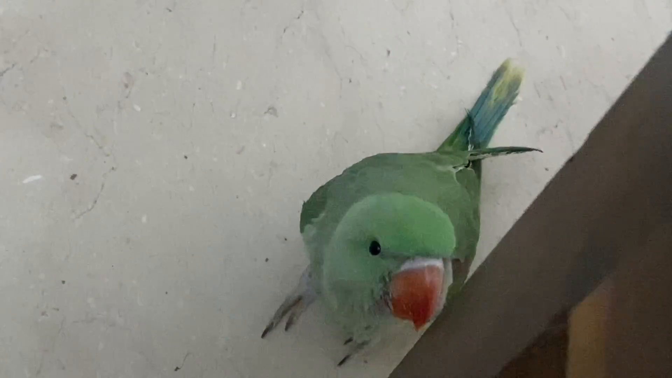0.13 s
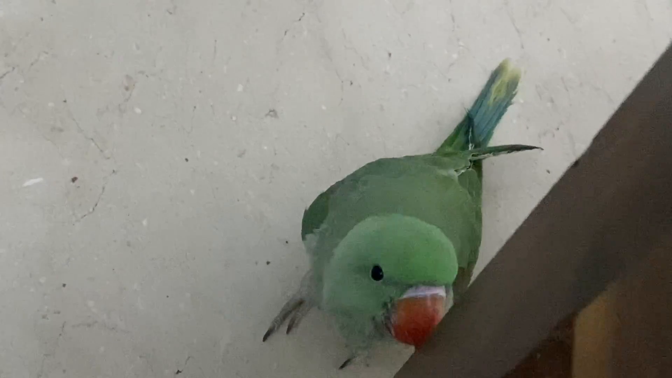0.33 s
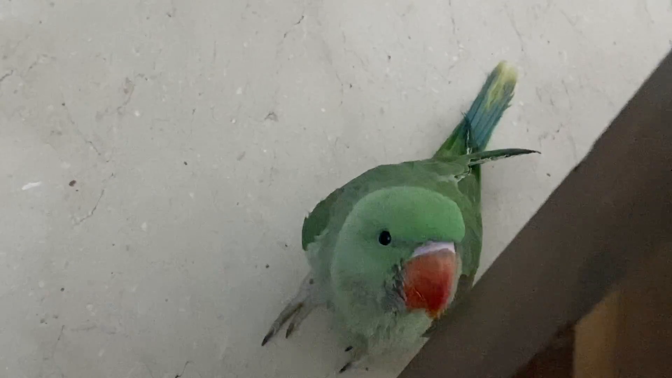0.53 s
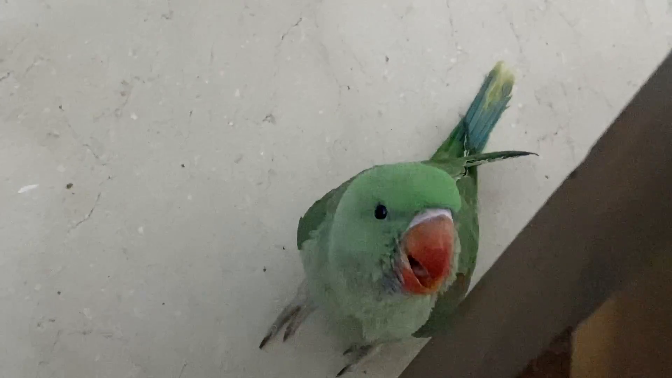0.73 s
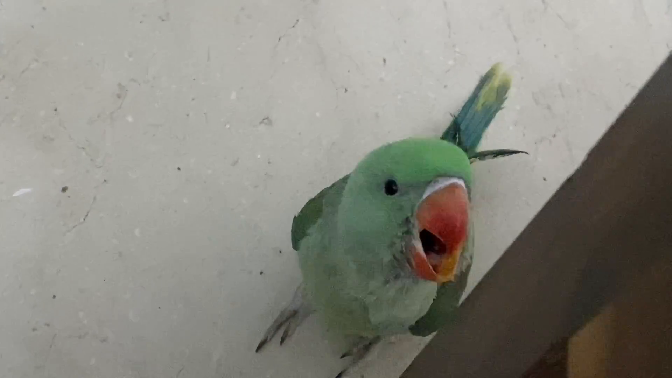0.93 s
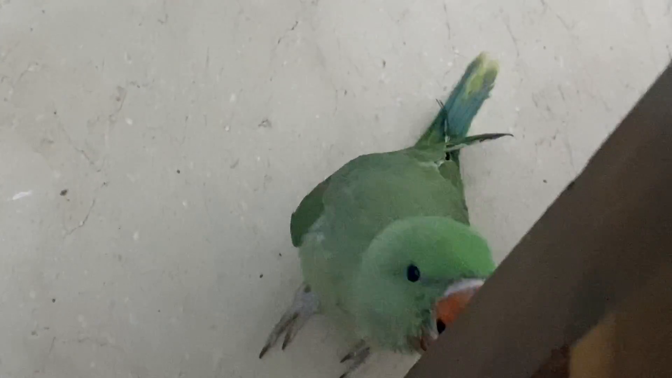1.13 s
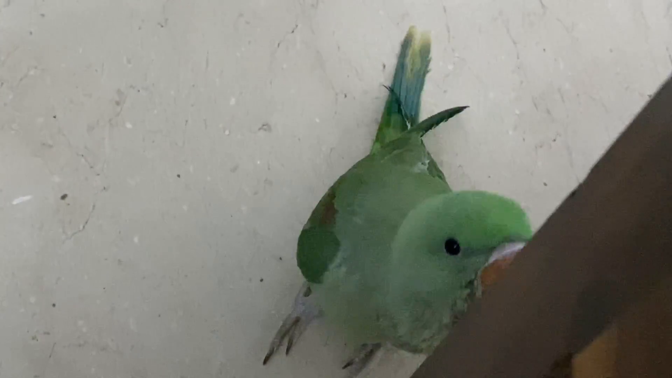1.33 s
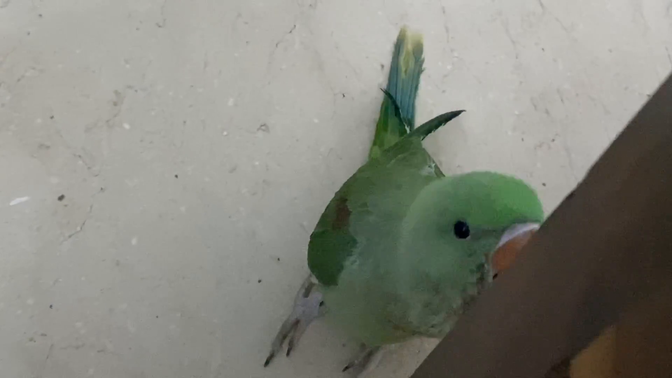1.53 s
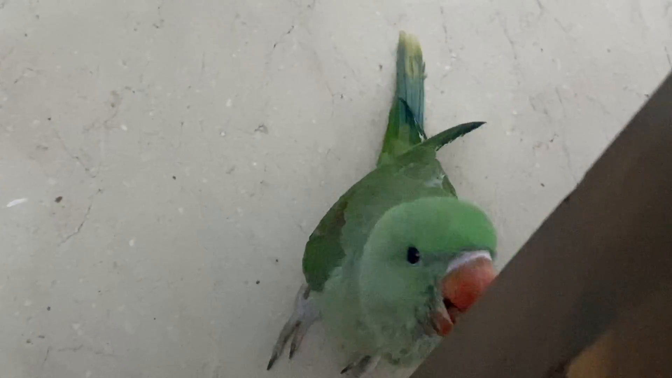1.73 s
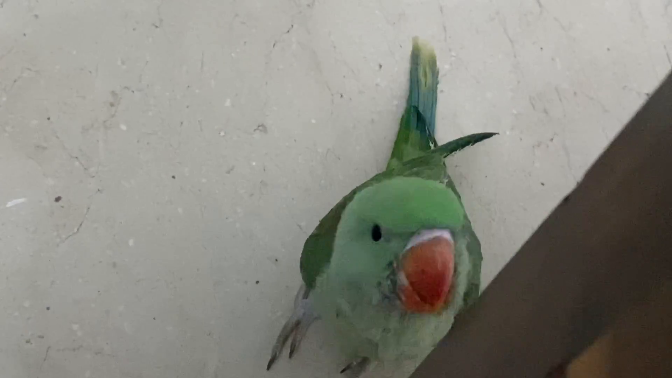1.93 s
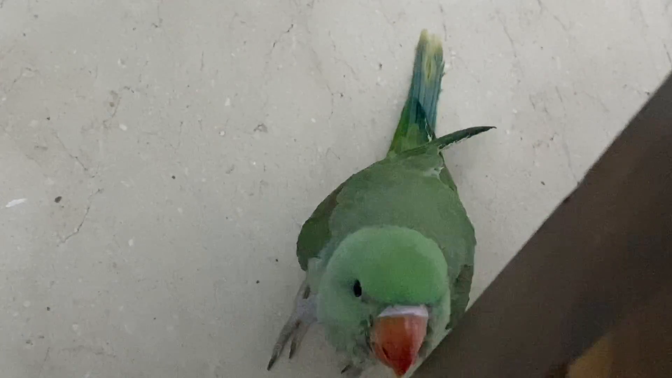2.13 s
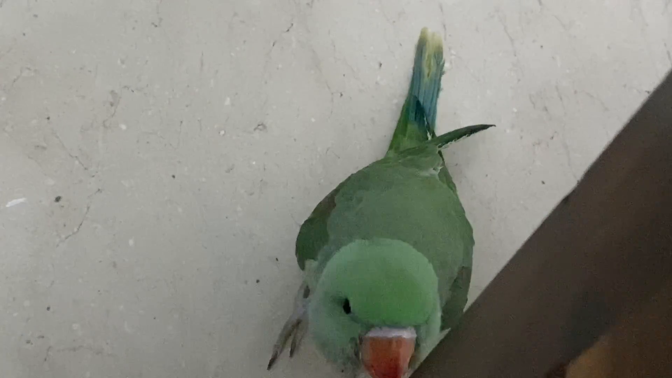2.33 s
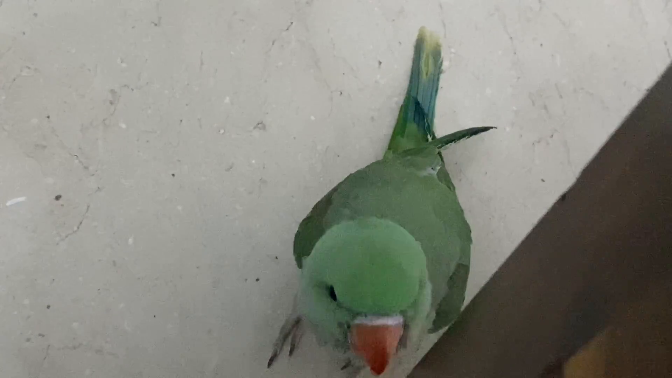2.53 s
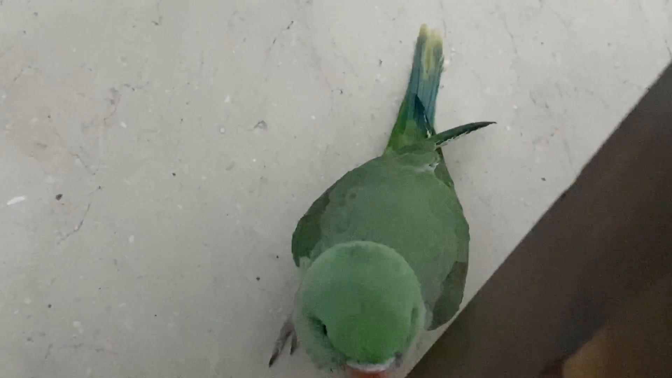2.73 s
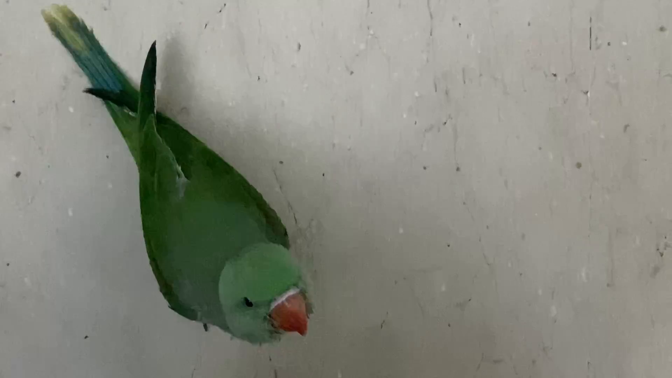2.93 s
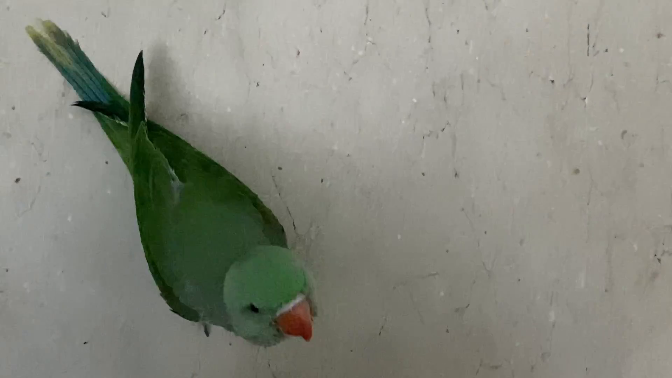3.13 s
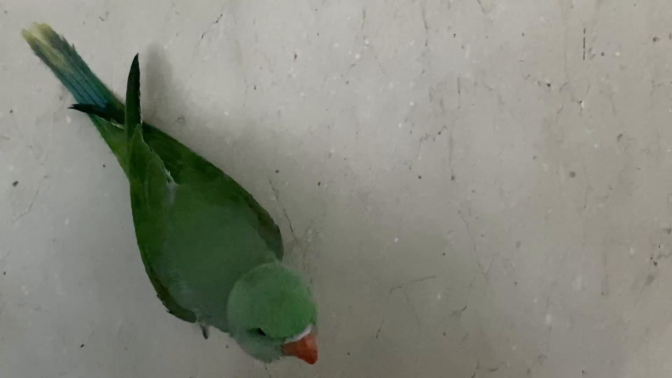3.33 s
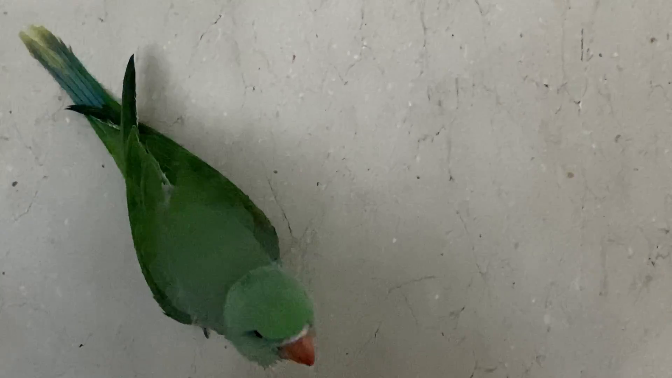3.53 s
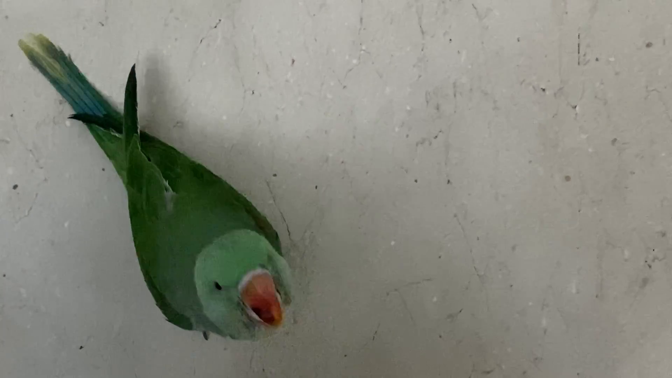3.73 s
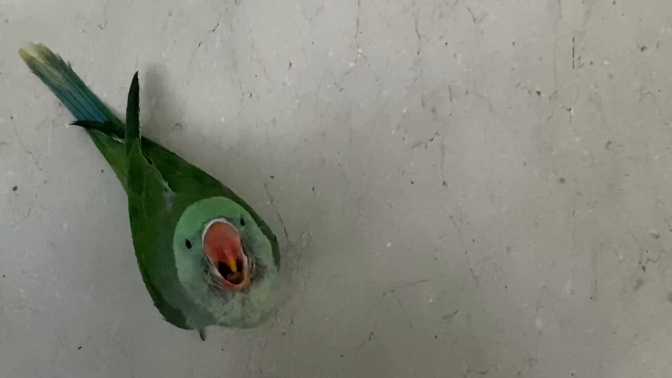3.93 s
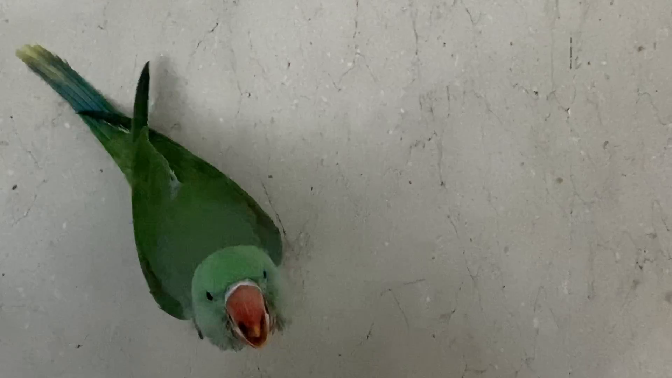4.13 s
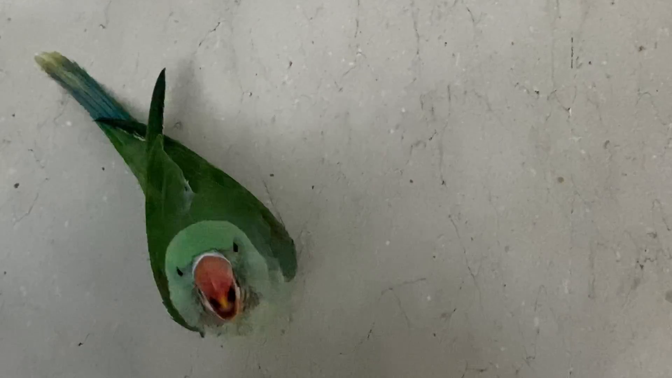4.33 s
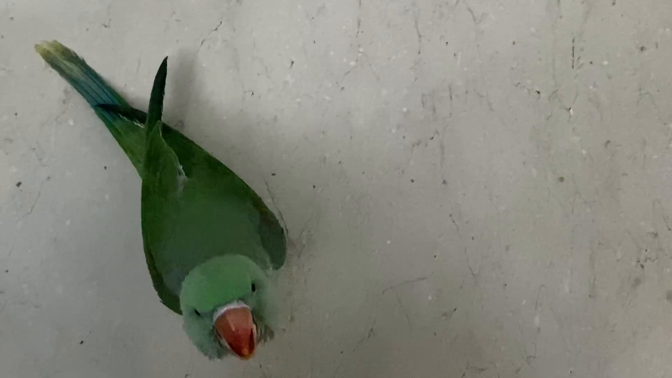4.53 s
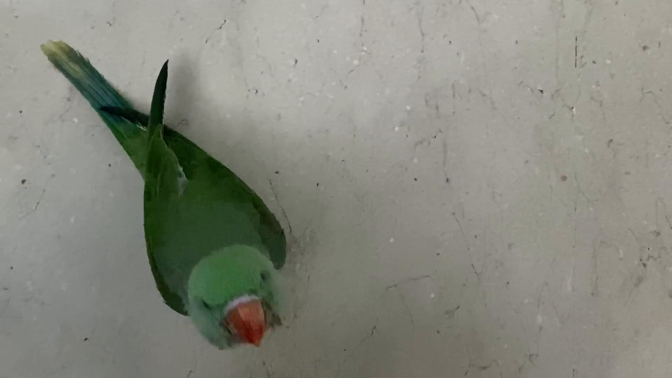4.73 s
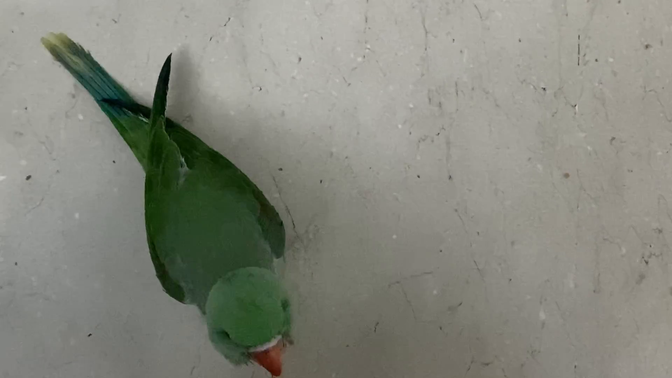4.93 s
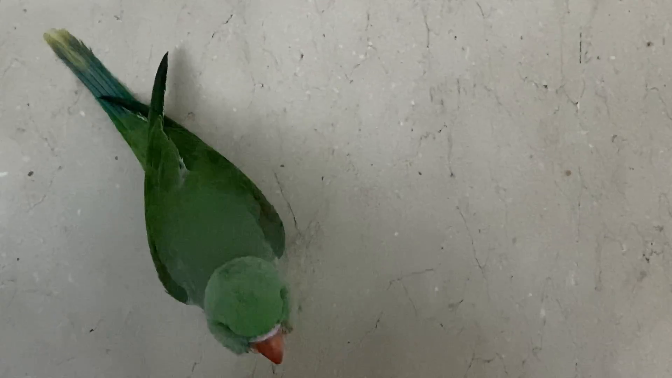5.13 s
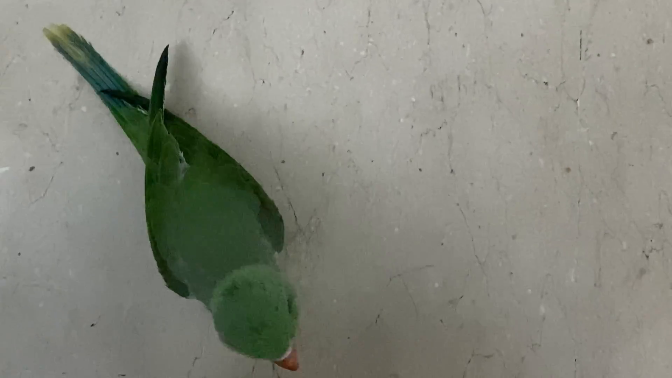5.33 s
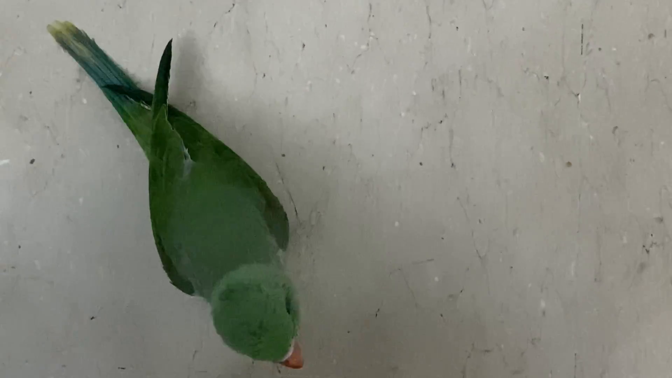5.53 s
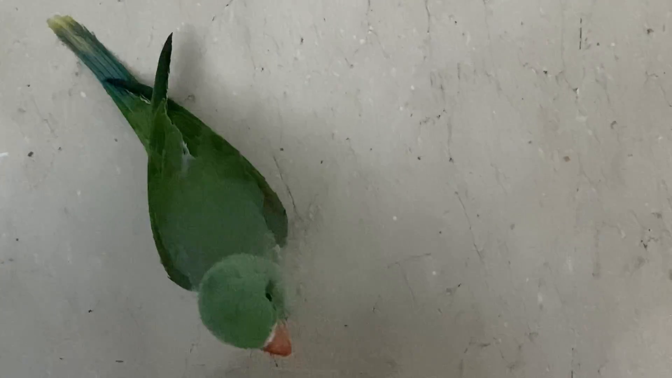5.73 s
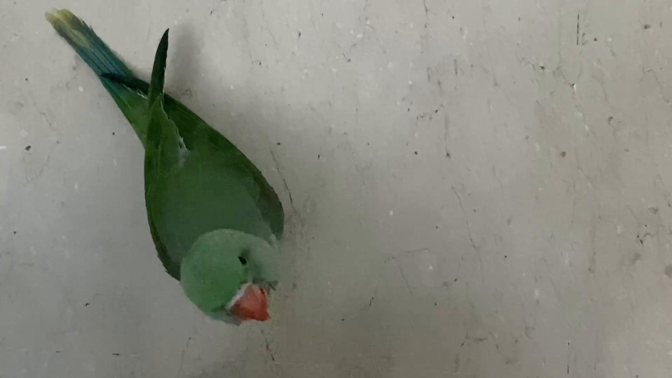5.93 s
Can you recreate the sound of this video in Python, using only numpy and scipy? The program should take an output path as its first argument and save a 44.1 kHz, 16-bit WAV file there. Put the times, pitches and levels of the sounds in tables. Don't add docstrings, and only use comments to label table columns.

```python
import sys
import numpy as np
from scipy import signal
from scipy.fft import rfft, irfft
from scipy.io import wavfile
from scipy.ndimage import uniform_filter1d

SR = 44100
rng = np.random.default_rng(int(sys.argv[2]) if len(sys.argv) > 2 else 0)


def digitize_waveform(pressure):
    field = np.atleast_2d(pressure).T
    bounded = np.clip(field, -1, 1)
    quanta = np.round(bounded * 32767).astype(np.int16)
    wavfile.write(sys.argv[1], SR, quanta)


def ratio(d):
    e = np.asarray(d, float) / 20
    return 10 ** e


N = 268569

# (t/s, length/s)
LEAP = (.827, .0485)


def evened(x):
    return x / np.sqrt(np.mean(x ** 2) + 1e-20)


def read(points, hz):
    f, value = np.transpose(points)
    return np.interp(np.log(hz + 1), np.log(f + 1), value)


def add(mix, s, sound):
    part = mix[round(s * SR):][:len(sound)]
    part += sound[:len(part)]


def causal(points, modes=(), size=4096):
    hz = np.fft.rfftfreq(size, 1 / SR)
    bumps = sum(db * np.exp(-(2 * (hz - f) / w) ** 2 / 2) for f, w, db in modes)
    half = np.log(ratio(read(points, hz) + bumps))
    full = np.concatenate([half, half[-2:0:-1]])
    return np.fft.ifft(np.exp(np.conj(signal.hilbert(full)))).real[:size // 2]


def ports(x, lead, tilt):
    hz = np.fft.rfftfreq(x.shape[-1], 1 / SR)
    half = ratio(read(tilt, hz) / 2) * np.exp(.5j * read(lead, hz))
    return irfft(rfft(x) * np.array([half, 1 / half]), x.shape[-1])


def squawk(rows, efforts_db, creak, creak_voice, colour, quavers, depths, beak):
    # (f/Hz, level/dB)
    throat = [(300, -37), (800, -22), (1300, -14), (2000, -5), (2350, 5), (2650, 9), (3200, 3.5),
              (4000, -3.5), (4500, -14), (5000, -17.5), (7000, -19.5), (9000, -28.5), (12000, -45),
              (16000, -50)]
    floor_notch = (3880, 170, -5.5)
    quaver_ms, recovery_lag = 7.4, .33
    t, hz, effort_db, rough, first_db, bright_db = controls(rows, efforts_db, creak, creak_voice, colour[:3])

    at, drop = quaver_train(quavers, depths, t[-1])
    away = (t - at) / (quaver_ms / 1000)
    slack = np.exp(-(away - recovery_lag * np.maximum(away, 0)) ** 2)
    swell_db = ((-5.5 + colour[3] * drop) * slack).sum(0)
    rough = np.clip(rough, 0, 1)
    jitter = evened(uniform_filter1d(rng.standard_normal(SR), size=60))[:len(t)]
    hz = hz * (1 - (drop * slack).sum(0)) * (1 + 0.18 * rough * jitter)
    turns = np.cumsum(hz) / SR

    k = np.arange(1, 31)[:, None]
    heights = ratio(bright_db * np.log2(k * hz / 3000) + np.where(k == 1, first_db, swell_db))
    heights = heights * np.clip((17000 - k * hz) / 3000, 0, 1)
    flicker = uniform_filter1d(rng.standard_normal((30, SR // 2)), size=180)
    flicker = uniform_filter1d(flicker, size=120)[:, :len(t)]
    heights = heights * ratio(np.minimum(1.8 * (k - 1), 6.5) * evened(flicker))
    beats = (heights * np.cos(2 * np.pi * k * turns)).sum(0) * np.sqrt(hz / 1800)

    puffs = (0.24 + np.exp(-(turns % 1) / 0.1)) * rng.standard_normal(SR)[:len(t)]
    drive = (1 - rough) * beats + 3 * rough ** 2 * puffs
    drive = drive * ratio(effort_db) * np.minimum((t - t[0]) / .005, 1)
    drive = drive * signal.windows.tukey(len(t), .006)
    return t[0], signal.oaconvolve(drive, causal(throat, beak + [floor_notch]))


def controls(rows, db, creak, creak_voice, colour):
    # (f/Hz, effort level/dB, brightness dB per octave, first harmonic level/dB)
    high_voice = (2680, -19.5, 5, 2)
    snap_s = .0015
    release_s, outset_s, opening_s = .011, .022, .0055
    clear_rough, end_rough = .035, .2
    wilt_db, dulling_db = -9, -3
    s, hz = np.transpose(rows)
    start, opening, from_hz, to_hz, creak_rough = creak
    murmur_db, open_db, creak_bright_db = creak_voice
    first_db, outset_db, bright_db = colour

    t = np.arange(start, s[-1] + release_s, 1 / SR)
    when = np.r_[start, s[0] - snap_s, s, s[-1] + release_s]
    hz = np.interp(t, when, np.r_[from_hz, to_hz, hz, 0.71 * hz[-1]])
    db = np.interp(t, when, np.r_[open_db, open_db, db, db[-1] - 12])
    db = db + (murmur_db - open_db) * np.clip((opening - t) / opening_s, 0, 1)

    spent = np.clip((t - s[0]) / (s[-1] - s[0]), 0, 1)
    creaking = np.clip((s[0] - t) / snap_s, 0, 1)
    rough = clear_rough + creaking * (creak_rough - clear_rough)
    rough = rough + end_rough * np.maximum(t - s[-1], 0) / release_s
    bright_db = bright_db + dulling_db * spent ** 2
    bright_db = bright_db + creaking * (creak_bright_db - bright_db)
    first_db = first_db + outset_db * np.exp(-(np.maximum(t - s[0], 0) / outset_s) ** 2)
    first_db = first_db + wilt_db * spent ** 4

    at, length = LEAP
    leapt = np.clip(np.minimum(t - at, at + length - t) / snap_s + 1, 0, 1)
    voice = (hz, db, bright_db, first_db)
    hz, db, bright_db, first_db = (low + leapt * (top - low) for low, top in zip(voice, high_voice))
    return t, hz, db, rough, first_db, bright_db


def quaver_train(times, depths, end):
    first, period_ms, quicken_ms = times
    first_drop, deepest, deepest_s = depths
    k = np.arange(10)[:, None]
    at = first + (period_ms * k - quicken_ms * k ** 2 / 2) / 1000
    drop = np.interp(at, [first, deepest_s], [first_drop, deepest])
    drop = drop * np.clip(1 - (np.maximum(at - deepest_s, 0) / (end - deepest_s)) ** 2, 0, 1)
    in_leap = (at > LEAP[0]) & (at < sum(LEAP) + .005)
    drop = drop * np.where(in_leap, .75, 1)
    return at, drop


def pops():
    # (t/s, level/dB, length/ms)
    pop_events = [
        (.7453, -37.5, .5),
        (1.2476, -31.5, 1.2),
        (3.6445, -24, 0.22),
        (4.1135, -18.5, 0.81),
        (4.1153, -24.5, 0.57),
    ]
    out = np.zeros(N)
    for s, db, ms in pop_events:
        u = np.arange(400) / (SR * ms / 4000)
        add(out, s, ratio(db) * u * (2 - u) * np.exp(-u))
    return out


def room(x):
    # (delay/ms, level/dB)
    echoes = [(.6, -18.5), (1.7, -19.5), (3.1, -12.5), (5.3, -14.5), (8.7, -12.5), (13.1, -22.5),
              (17.5, -19), (23, -14)]
    # (f/Hz, time/s)
    ring_times = [(1000, 0.67), (2640, 0.65), (6960, 0.47)]
    # (f/Hz, level/dB)
    echo_colour = [(1000, 3.5), (2000, 2), (2700, -1.5), (4000, 0.5), (7000, 1), (12000, -10)]
    # (f/Hz, likeness 0-1)
    ring_same = [(1000, 0.95), (2500, 0.28), (4200, 1), (4600, 1), (7000, 1), (8000, 0.98), (15000, 0.63)]
    early = np.zeros(SR // 20)
    for ms, db in echoes:
        early[round(ms * SR / 1000)] = ratio(db)
    early = signal.oaconvolve(early, causal(echo_colour))

    taps = np.zeros((2, SR))
    at = np.arange(700, SR - 20, 20) + rng.integers(0, 20, (2, (SR - 701) // 20))
    np.put_along_axis(taps, at, rng.choice([-1., 1.], at.shape), 1)
    hz, t, z = signal.stft(taps, SR, nperseg=256)
    same = np.clip(read(ring_same, hz), 0, 1)[:, None]
    z = np.array([np.sqrt(1 + same) * z[0] + side * np.sqrt(1 - same) * z[1] for side in (1, -1)])
    tail = signal.istft(z * ratio(-60 * t / read(ring_times, hz)[:, None]), SR, nperseg=256)[1]
    tail = signal.oaconvolve(tail / np.linalg.norm(tail[0]), causal(echo_colour)[None], axes=1)
    ringing = signal.fftconvolve(x[None], tail, axes=1)[:, :N]
    return signal.oaconvolve(x, early)[:N] + ratio(-8) * ringing


def hum():
    # (f/Hz, level/dB per Hz)
    rumble = [(18, -52), (30, -32.5), (45, -24.5), (65, -0.5), (128, -1.5), (160, -18), (230, -5.5),
              (445, -14.5), (900, -15), (1350, -26), (2000, -29), (3600, -39.5), (8000, -55), (11000, -80)]
    # (f/Hz, likeness)
    hum_same = [(60, 0.97), (130, 0.93), (290, 0.84), (640, 0.55), (1410, 0.4), (3100, 0.89), (6820, 0.62),
                (15000, 0.34)]
    # (f/Hz, left minus right level/dB)
    hum_tilt = [(60, 2.5), (180, 3), (550, 1.0), (1650, -1.5), (4970, 1.5), (15000, -3)]
    # (f/Hz, lead of the left port/radians)
    hum_lead = [(300, 0), (1400, .5), (2100, 0), (7000, 0)]
    # (f/Hz, width/Hz, level/dB)
    motor = [(57.4, 14, -69.5), (136.08, 22, -69), (199.63, 21, -59), (261, 19, -67.5), (294, 11, -69.5)]
    # (t/s, length/s)
    ducks = [
        (.82, 0.36),
        (3.72, .38),
    ]
    duck_db, duck_fade_s = -4.5, .09
    frames, hz = N // 512 + 5, np.fft.rfftfreq(2048, 1 / SR)
    a, b, c, d, patches = rng.standard_normal((frames, 1025, 5)).T
    patches = uniform_filter1d(patches, size=16, axis=0)
    patches = evened(uniform_filter1d(patches, size=8, axis=1))
    same = np.clip(read(hum_same, hz), -1, 1)[:, None]
    left = a + 1j * b
    z = np.array([left, same * left + np.sqrt(1 - same ** 2) * (c + 1j * d)])
    z = z * ratio(read(rumble, hz)[:, None] + 1.2 * patches)
    wash = signal.istft(z, nperseg=2048, noverlap=1536)[1][:, :N]

    t, tones = np.arange(N) / SR, 0
    for tone_hz, width_hz, db in motor:
        r = np.exp(-1.5 * np.pi * width_hz / SR)
        noise = rng.standard_normal(N) + 1j * rng.standard_normal(N)
        waver = signal.lfilter([1], [1, -2 * r, r * r], noise)
        tones = tones + ratio(db) * evened((waver * np.exp(2j * np.pi * tone_hz * t)).real)

    pressed = sum(np.clip(np.minimum(t - s, s + length - t) / duck_fade_s, 0, 1) for s, length in ducks)
    return ports(ratio(duck_db * pressed) * (ratio(-55) * evened(wash) + tones), hum_lead, hum_tilt)


def whistles():
    # (t/s, length/s, f/Hz, level/dB)
    far_tones = [
        (.23, .13, 2080, -86),
        (.3, .2, 1560, -87),
        (.28, .3, 3150, -90),
        (5.88, .19, 2960, -81),
    ]
    out = np.zeros(N)
    for s, length, hz, db in far_tones:
        t = np.arange(0, length, 1 / SR)
        tone = np.sqrt(2) * np.sin(2 * np.pi * hz * t)
        add(out, s, ratio(db) * tone * signal.windows.tukey(len(t), .4))
    return out


def scene():
    # (t/s, pitch between quavers f/Hz)
    voices = [
        [(.754, 1290), (.778, 1350), (.79, 2040), (.826, 2110), (.895, 2080), (.957, 1900), (1.02, 1595),
         (1.05, 1410), (1.084, 1310)],
        [(1.2595, 1290), (1.269, 1670), (1.31, 1980), (1.378, 1925), (1.446, 1790), (1.51, 1555), (1.54, 1400),
         (1.57, 1285)],
        [(3.618, 1440), (3.642, 1515), (3.656, 2080), (3.69, 2190), (3.755, 2140), (3.852, 1945), (3.885, 1715),
         (3.915, 1490), (3.953, 1365)],
        [(4.125, 1350), (4.142, 1560), (4.172, 1920), (4.21, 1965), (4.276, 1875), (4.34, 1710), (4.37, 1575),
         (4.405, 1410), (4.437, 1270)],
    ]
    efforts = [
        [-44, -23, -21, -15.5, -22.5, -23, -24.5, -25.5, -26],
        [-26, -26.5, -20, -18.5, -22, -23, -25, -28],
        [-34, -25.5, -19, -17, -16.5, -19.5, -22, -24, -24],
        [-23, -21, -17.5, -20.5, -16, -20.5, -22.5, -23.5, -27],
    ]
    # (t/s, murmur breaks open t/s, from f/Hz, to f/Hz, roughness 0-1)
    creaks = [(.7445, .75, 380, 533, .3), (1.2345, 1.252, 620, 916, .07), (3.601, 3.612, 714, 1050, .15),
              (4.105, 4.114, 463, 800, .4)]
    # (murmur level/dB, open level/dB, brightness dB per octave)
    creak_voices = [(-34, -36, -2.5), (-34, -20, -0.94), (-39, -34, 0), (-22, -21, -6)]
    # (first harmonic level/dB, extra at the outset level/dB,
    # brightness dB per octave, quaver swell dB per unit of pitch drop)
    colours = [(-1, 4.5, 1.5, 51.5), (-1.5, 4, -0.4, 40.5), (2, 12, 2, 55), (2.5, -20.5, 0.2, 42.5)]
    # (first t/s, period/ms, quickening/ms per quaver)
    trains = [(.813, 31.8, 0), (1.291, 34.2, .15), (3.677, 31.9, 0), (4.1515, 37, 1)]
    # (first pitch drop as a share, deepest drop, deepest at t/s)
    quaver_depths = [(.13, .195, .91), (.125, .18, 1.44), (.095, .215, 3.81), (.16, .15, 4.33)]
    # (f/Hz, width/Hz, level/dB)
    beaks = [
        [(2400, 300, -4), (5335, 400, -13.5), (5617, 740, 16.5), (7820, 1000, 10), (10750, 710, 9)],
        [(2270, 230, 3.5), (5060, 85, -7.5), (5800, 1600, 9), (7540, 860, 6), (9400, 400, 9.5)],
        [(2510, 660, -2.5), (4970, 490, 0.5), (6700, 460, 6.5), (7380, 270, 7), (11160, 1000, 12.5)],
        [(2550, 270, -2), (4750, 300, -1), (5360, 230, 6.5), (7430, 740, 1.5), (12100, 880, 3.5)],
    ]
    turned_db = [-3.5, -2.5, -2.5, -4.5]
    # (f/Hz, lead of the left port/radians)
    port_lead = [(800, 0), (1400, 1), (2300, .1), (3100, .4), (4600, 0), (7050, 0), (8790, -3),
                 (9150, -3.2), (11200, -6.3), (12230, -7.7), (12600, -9), (13600, -9.4), (14900, -12.5),
                 (16000, -12.6)]
    # (f/Hz, left minus right level/dB)
    port_tilt = [(60, 1.5), (110, 5.5), (200, -2.5), (380, 0.5), (700, 3.5), (1290, 3), (2380, -0.5),
                 (4400, 0.5), (8120, 1.5), (15000, -1)]
    direct, aside = pops(), pops()
    calls = zip(voices, efforts, creaks, creak_voices, colours, trains, quaver_depths, beaks, turned_db)
    for *call, db in calls:
        s, sound = squawk(*call)
        add(direct, s, sound)
        add(aside, s, ratio(db) * sound)
    return ports(direct + room(aside), port_lead, port_tilt) + hum() + whistles()


def masking(x):
    # (from f/Hz, to f/Hz, buried under level/dB, cut level/dB)
    haze_bands = [(1150, 5600, 29.5, -6.5), (13000, 17000, 50, -18.5)]
    soft_db = 5.5
    hz, _, z = signal.stft(x, SR, nperseg=1024, noverlap=768)
    power = uniform_filter1d((abs(z) ** 2).mean(0), size=5, axis=0)
    power = uniform_filter1d(power, size=3, axis=1)
    level_db = 10 * np.log10(abs(power) + 1e-20)
    under_db = level_db[hz > haze_bands[0][0]].max(0) - level_db
    cut_db = 0
    for lo_hz, hi_hz, buried_db, db in haze_bands:
        inside = ((hz > lo_hz) & (hz < hi_hz))[:, None]
        cut_db = cut_db + db * np.clip((under_db - buried_db) / soft_db, 0, 1) * inside
    return signal.istft(z * ratio(cut_db), SR, nperseg=1024, noverlap=768)[1][:, :N]


def low_pass(x):
    return signal.sosfilt(signal.butter(12, 16140, fs=SR, output="sos"), x)


def record(dry):
    # (t/s, half width/s)
    silence = (2.868, .008)
    fade = np.clip(abs(np.arange(N) / SR - silence[0]) / silence[1] - .3, 0, 1)
    return low_pass(masking(dry) * fade)


dry = scene()
out = record(dry)
digitize_waveform(out)
```